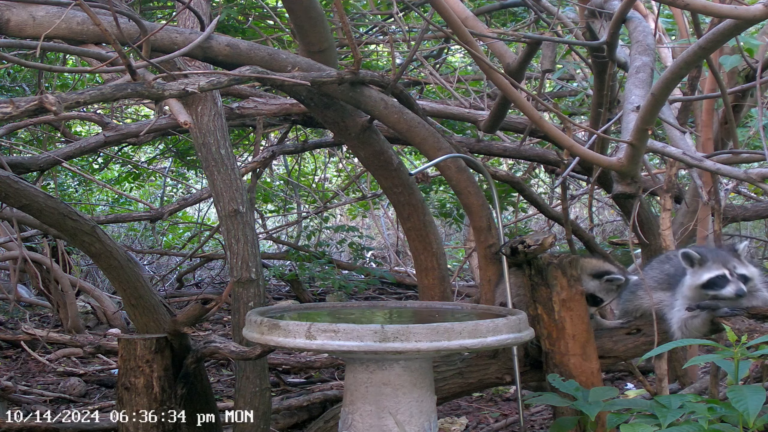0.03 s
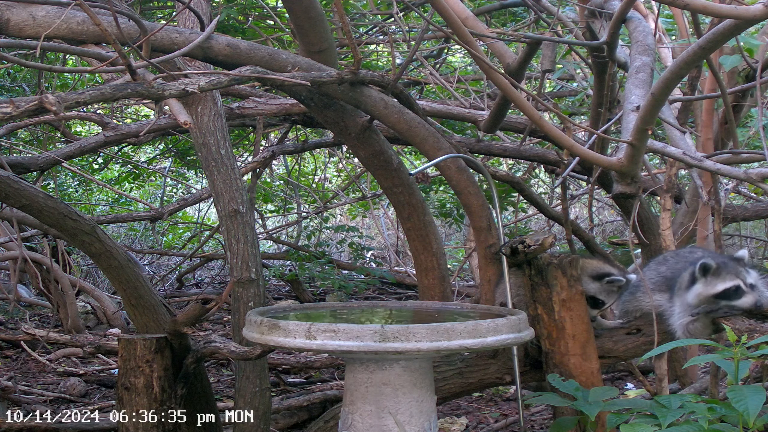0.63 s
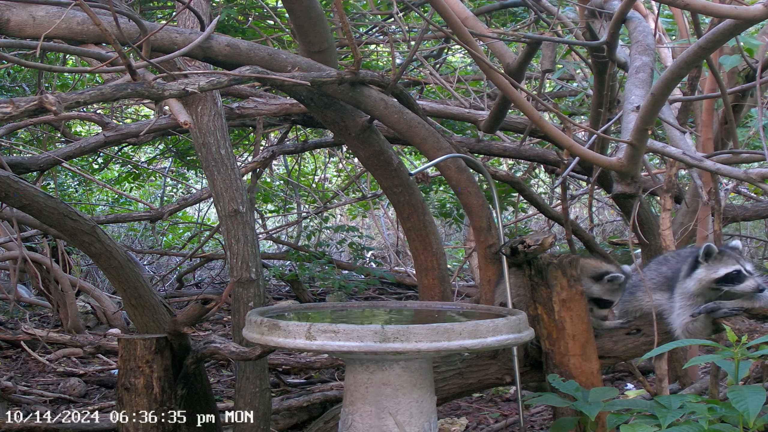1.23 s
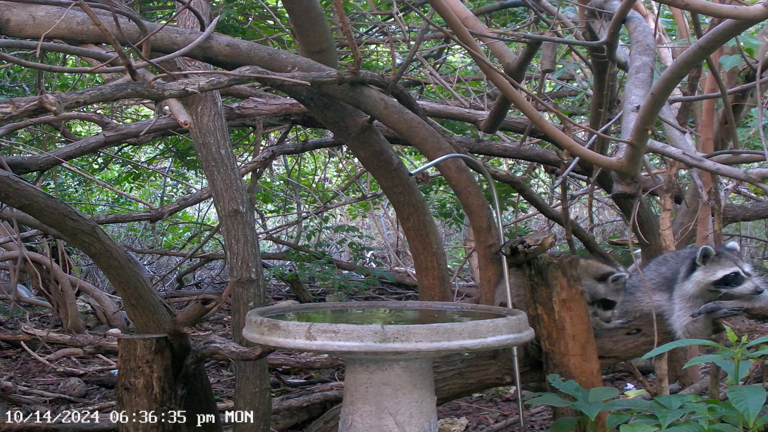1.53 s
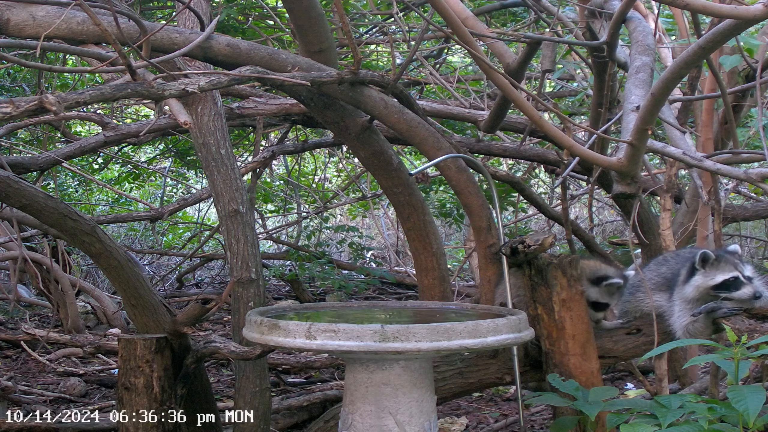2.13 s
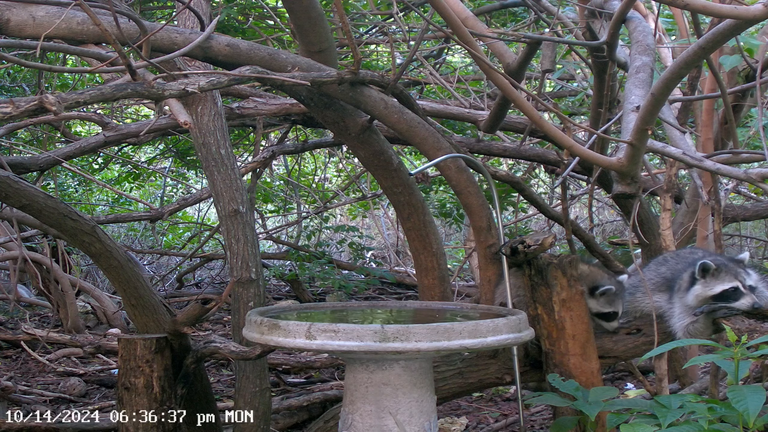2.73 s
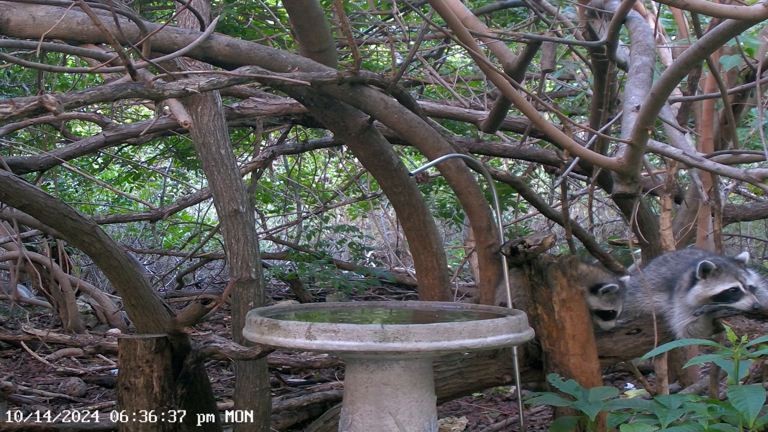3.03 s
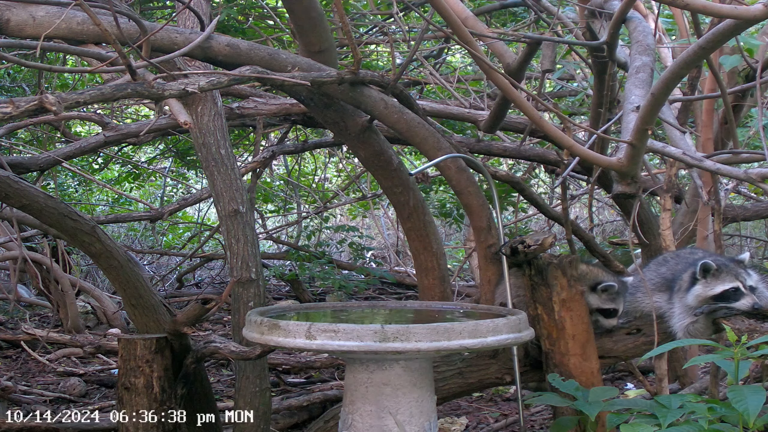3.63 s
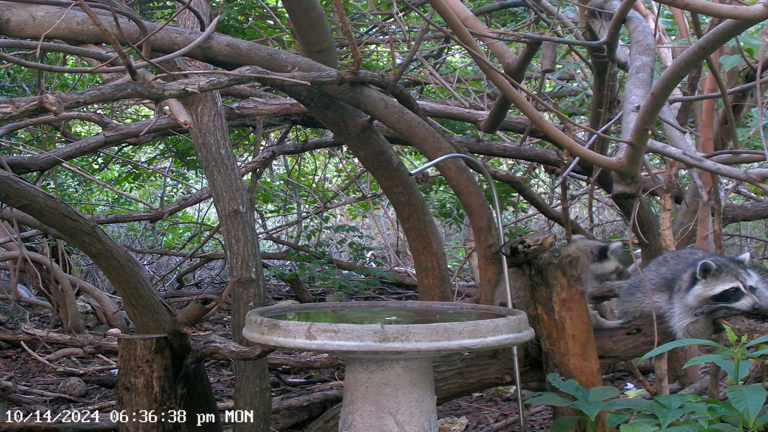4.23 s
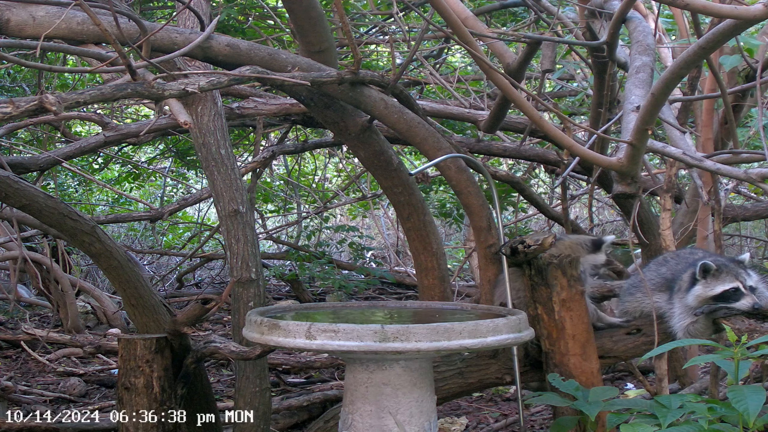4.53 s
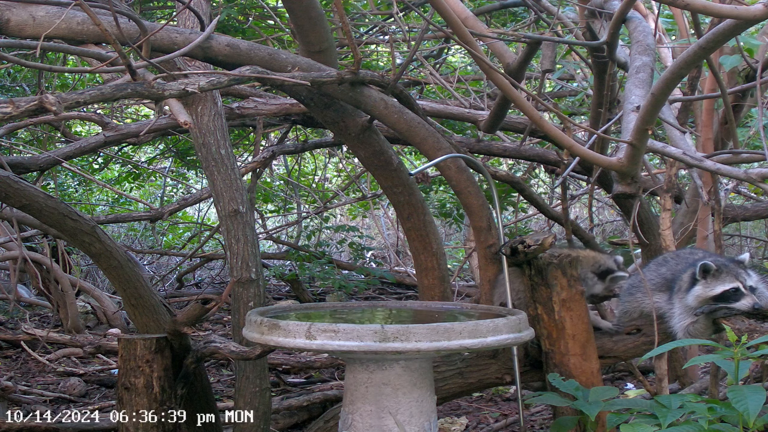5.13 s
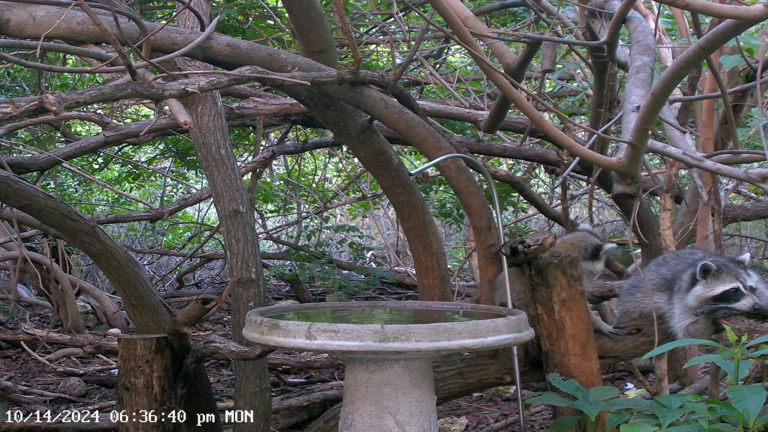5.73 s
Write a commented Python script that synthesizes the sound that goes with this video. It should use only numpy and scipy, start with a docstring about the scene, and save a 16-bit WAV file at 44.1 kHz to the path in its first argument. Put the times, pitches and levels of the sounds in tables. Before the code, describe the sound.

In a thicket, a small animal, perhaps a young raccoon, gives four short, evenly spaced squeaky chirps close to the microphone. Behind the trees a two-cylinder engine pounds, speeds up a little and fades away as the chirps end. After that, twigs tick faintly under climbing paws. Distant traffic rumbles throughout, with a faint mains hum and the hiss of a small outdoor camera.

```python
"""Chirps in a thicket

Close to the microphone a small animal, perhaps a young raccoon, gives four short squeaky chirps,
its larynx ringing through throat and mouth. Twigs tick under climbing paws; a far bird trills once.
Behind the trees a twin-cylinder engine pounds through its pipe, speeds up, then comes off the throttle.
Distant traffic rumbles on, under a faint mains hum and the hiss of a small outdoor camera."""
import sys
import numpy as np
from scipy import signal
from scipy.fft import rfft, irfft, next_fast_len
from scipy.io import wavfile
from scipy.ndimage import map_coordinates

SR = 44100
rng = np.random.default_rng(int(sys.argv[2]) if len(sys.argv) > 2 else 0)


def inscribe(sig):
    """Save sig as 16-bit PCM at rate SR to the path in sys.argv[1].

    A 1-D sig is mono; a 2-D sig holds one channel per row.
    Samples are clipped to [-1, 1] before scaling.
    """
    pcm = np.round(np.clip(np.atleast_2d(sig).T, -1, 1) * 32767)
    wavfile.write(sys.argv[1], SR, pcm.astype(np.int16))


N = 258867
TIME = np.arange(N) / SR

# Colours of the background noises. Each row: frequency in Hz, relative spectral density in dB.
HISS_COLOUR = [(500, -9.5), (1500, -4), (2000, -0.5), (2750, -3.5), (3450, 1), (3900, -0.5), (4300, -7.5),
               (4700, -6.5), (5100, -10), (7300, -10.5), (8000, -12)]
RUMBLE_COLOUR = [(20, -25), (45, -6), (65, 1), (90, -10), (160, -32.5), (400, -120)]
BUFFET_COLOUR = [(5, -8), (14, -3.5), (35, -5.5), (50, -14), (100, -40), (300, -120)]
DRONE_COLOUR = [(40, -20), (70, -4.5), (95, -0.5), (125, -1), (165, -8), (200, -15.5), (260, -18),
                (400, -49), (800, -88)]
TYRE_COLOUR = [(120, -23), (220, 1), (330, -2.5), (550, -1.5), (770, 1), (1000, -5.5), (1300, -12.5),
               (2000, -21), (3500, -34), (7000, -79)]
# The camera's hiss. Each row: time in seconds, level in dB.
HISS_LEVEL = [(0, -77.5), (1.8, -77), (2.4, -77.5), (4.3, -80.5), (5.87, -80)]
# Swells in the rumble. Each row: middle in seconds, level in dB, centre in Hz, half length in seconds.
SWELLS = [(0.736, -37, 20, 0.035), (0.982, -41.5, 65, 0.044), (1.668, -46, 62, 0.087),
          (2.765, -57, 110, 0.16), (3.798, -58.5, 45, 0.26), (4.634, -53, 59, 0.2), (5.78, -55.5, 64, 0.05)]

# Echoes off the trunks. Each row: delay in seconds, gain in dB.
TRUNK_ECHOES = [(0.0116, -17.5), (0.017, -31.5), (.057, -17.5)]
# Reverberation among the branches. Each row: frequency in Hz, seconds to fall 60 dB.
BRANCH_DECAY = [(500, 1), (3000, 0.45), (8000, 0.66)]

# Engine speed. Each row: time in seconds, four-stroke cycles per second.
ENGINE_SPEED = [(0, 30.2), (.11, 27.75), (.17, 27.4), (.65, 30.54), (.99, 32.31), (1.43, 34.54),
                (1.6, 35.86), (1.78, 36.5), (2.3, 35.82)]
# Rush of exhaust gas. Each row: frequency in Hz, relative spectral density in dB.
GAS_COLOUR = [(60, -23.5), (140, -1.5), (400, 4), (600, -6.5), (900, -6), (1300, -15), (2000, -17.5),
              (3600, -24.5), (4800, -31.5), (7500, -49)]
# The gas and the six exhaust bands, low to high, ahead of the throttle's fade.
# Each row: time in seconds, level in dB.
GAS_LEVEL = [(0, -61.5), (.7, -64.5), (1.45, -63), (1.65, -61)]
THUMP_LEVEL = [(.1, -50.5), (1.001, -51), (1.35, -51.5), (1.6, -69.5)]
BOOM_LEVEL = [(0, -54), (0.249, -49.5), (.58, -54.5), (.9, -53.5), (1, -46), (1.1, -57), (1.33, -58),
              (1.46, -50.5), (1.75, -59)]
BODY_LEVEL = [(0, -58), (.25, -65), (.45, -54), (.7, -57.5), (.95, -58), (1.251, -67.5), (1.55, -66),
              (1.75, -68)]
BARK_LEVEL = [(0, -60.5), (.11, -59), (.26, -69), (.42, -63), (.8, -63.5), (1.12, -69), (1.3, -57),
              (1.47, -64), (1.65, -58), (1.8, -65.5)]
GROWL_LEVEL = [(0, -75), (.2, -67.5), (.35, -71.5), (.8, -63), (1.05, -63.5), (1.17, -67), (1.311, -61.5),
               (1.47, -65.5), (1.65, -59), (1.78, -68.5)]
RASP_LEVEL = [(1, -86), (1.17, -70), (1.3, -57.5), (1.45, -65), (1.651, -67), (1.75, -59), (1.86, -73)]

# Twigs and bark under paws. Each row: start in seconds, level in dB before a common trim,
# resonance in Hz, its half width in Hz, seconds to fall 60 dB.
TWIG_TICKS = [(0.71, -63.5, 3300, 447, 0.037), (2.2247, -63.5, 3504, 332, 0.045),
              (2.674, -66, 2640, 550, .07), (2.704, -70, 3050, 400, .06), (3.335, -69.5, 2510, 600, 0.098),
              (3.8977, -75.5, 6600, 600, 0.17), (3.9693, -70, 2900, 650, 0.086),
              (4.385, -63.5, 3800, 700, 0.027), (4.53, -70.5, 3950, 380, 0.26),
              (4.911, -68.5, 3830, 300, 0.077), (5.0845, -71, 3450, 380, 0.082),
              (5.243, -71, 2750, 300, .06), (5.8, -67.5, 4000, 800, .025)]
# Faint ringing after the first and third chirps, and two tiny peeps before the second.
# Each row: middle in seconds, pitch in Hz, level in dB, half length in seconds.
FAINT_TONES = [(.965, 2773, -62, 0.01), (.968, 1965, -71, 0.034), (1.161, 3240, -67.5, 0.0038),
               (1.212, 3079, -71, 0.0066), (1.672, 3190, -75, 0.029)]
# The animal's throat. Each row: frequency in Hz, relative gain in dB.
THROAT_RESPONSE = [(600, -15), (1300, 7.5), (2000, 0), (2800, 10.5), (3700, -1), (4500, -7), (5200, -12),
                   (7000, -25)]
# The four chirps. Each row: peak time in seconds, attack in seconds, squeak level in dB, collapse in dB
# per second, mouth resonance in Hz, roughness in radians, opening level in dB; then, for the thin
# echoing ring that lingers after it, pitch in Hz, centre in Hz, level in dB, fade in seconds.
CHIRPS = [(0.904, 0.024, -44.5, 945.5, 2780, 0.16, -53.5, 685, 2900, -61.5, 0.052),
          (1.249, 0.026, -49.5, 1009, 2740, 0.11, -64.5, 548, 3290, -64, 0.054),
          (1.568, 0.03, -50.5, 1153, 2840, 0.27, -65.5, 526, 3110, -63, 0.034),
          (1.877, 0.028, -60, 997, 3700, 0.27, -68, 780, 3770, -79, 0.075)]
# One pitch contour per chirp. Each row of a contour: time in seconds, pitch in Hz.
CHIRP_PITCH = [
    [(.888, 720), (.899, 722), (.911, 657), (.925, 645)],
    [(1.232, 527), (1.246, 549), (1.253, 597), (1.261, 515)],
    [(1.548, 580), (1.560, 526), (1.568, 574), (1.58, 577)],
    [(1.855, 730), (1.866, 760), (1.877, 742), (1.886, 695)],
]


def amp(db):
    """Decibels to gain."""
    return 10 ** (np.asarray(db) / 20)


def unit(x):
    """x at rms 1."""
    return x / np.sqrt(np.mean(x ** 2) + 1e-20)


def bell(x, width):
    """A smooth bump of height 1 around x = 0."""
    return np.exp(-(x / width) ** 2)


def step(x, width):
    """A smooth rise from 0 to 1 around x = 0."""
    return .5 + .5 * np.tanh(x / width)


def along(points, hz):
    """(Hz, value) points read on a log frequency axis."""
    freqs, values = np.transpose(points)
    return np.interp(np.log(hz + 1), np.log(freqs + 1), values)


def curve(points):
    """(seconds, value) points joined into one value per sample."""
    return np.interp(TIME, *np.transpose(points))


def wobble(rate):
    """A smooth random curve, rate knots a second."""
    return map_coordinates(rng.standard_normal(int(N * rate / SR) + 4), [TIME * rate])


def filtered(x, response):
    """x through a response given as a function of Hz."""
    size = next_fast_len(N + SR // 2)
    return irfft(rfft(x, size) * response(np.fft.rfftfreq(size, 1 / SR)), size)[:N]


def noise(colour):
    """Noise of rms 1 with the given colour."""
    return unit(filtered(rng.standard_normal(N), lambda hz: amp(along(colour, hz))))


def hum_and_hiss():
    """The noise floor: faint mains hum and the camera's own hiss."""
    hum = amp(-65) * np.sqrt(2) * np.sin(2 * np.pi * 60 * TIME)
    return hum + amp(curve(HISS_LEVEL)) * noise(HISS_COLOUR)


def far_traffic():
    """Rumble, low buffeting, drone and tyre noise, all sinking as the distant traffic recedes."""
    def receding(near_db, far_db, midway_s):
        return amp(near_db + (far_db - near_db) * step(TIME - midway_s, 0.94))

    rumble = receding(-55.5, -62, midway_s=2) * noise(RUMBLE_COLOUR)
    buffet = receding(-51, -58, midway_s=1.5) * noise(BUFFET_COLOUR)
    drone = receding(-59, -64.5, midway_s=3) * noise(DRONE_COLOUR)
    tyres = receding(-67.5, -71, midway_s=3) * amp(0.17 * wobble(4.5)) * noise(TYRE_COLOUR)
    return rumble + buffet + drone + tyres


def swells(half_width_octaves=0.54):
    """Brief soft surges of low noise."""
    out = np.zeros(N)
    for middle_s, db, centre_hz, half_length_s in SWELLS:
        shape = bell(TIME - middle_s, half_length_s)
        band = lambda hz: bell(np.log2((hz + 1) / centre_hz), half_width_octaves)
        surge = shape * filtered(rng.standard_normal(N), band)
        out += amp(db) * surge * np.linalg.norm(shape) / np.linalg.norm(surge)
    return out


def branches(x):
    """The diffuse tail that the branches scatter back to the microphone."""
    hz, t, spectrum = signal.stft(rng.standard_normal(SR // 2), SR, nperseg=256)
    decay = amp(-60 * t / along(BRANCH_DECAY, hz)[:, None])
    tail = signal.istft(spectrum * decay, SR, nperseg=256)[1]
    return signal.fftconvolve(x, tail / np.linalg.norm(tail))[:N]


def thicket(x, wet_db):
    """The direct sound, single echoes off the trunks and a diffuse tail from the branches."""
    trunks = lambda hz: sum(amp(db) * np.exp(-2j * np.pi * hz * delay) for delay, db in TRUNK_ECHOES)
    return x + filtered(x, trunks) + amp(wet_db) * branches(x)


def through_trees(x, delays_s=(.021, .037, .062), share=.2):
    """Side paths between the trees come and go, so each harmonic of a moving source wavers on its own."""
    paths = [np.pad(x, (round(delay * SR), 0))[:N] for delay in delays_s]
    return x + share * sum(wobble(rate=7) * path for path in paths)


def firings(gap_cycles=.585, second_cylinder_db=-1, scatter_db=1.2, scatter_s=.00012):
    """Two unevenly spaced exhaust pulses per cycle, each a little different in size and timing."""
    cycles_run = np.cumsum(curve(ENGINE_SPEED)) / SR
    cycles = np.arange(int(cycles_run[-1]))
    times = np.interp(np.concatenate([cycles, cycles + gap_cycles]), cycles_run, TIME)
    size_draw, time_draw = rng.standard_normal((len(times), 2)).T
    sizes = amp(np.repeat([0, second_cylinder_db], len(cycles)) + scatter_db * size_draw)
    samples = np.clip((times + scatter_s * time_draw) * SR, 0, N - 1).astype(int)
    return np.bincount(samples, sizes, N)


def exhaust_band(pulses, band_hz, level):
    """The pulses ringing in one band of the exhaust pipe."""
    bandpass = signal.butter(5, band_hz, 'bandpass', fs=SR, output='sos')
    return amp(curve(level)) * unit(signal.sosfilt(bandpass, pulses))


def engine(puff_s=0.015, throttle_off_s=1.853, drop_db=6, fade_db_per_s=32.5, wet_db=-13):
    """Behind the trees, each firing rings the pipe and puffs out gas; both fade as the throttle closes."""
    pulses = firings()
    wavering = through_trees(pulses)
    pipe = (exhaust_band(pulses, (73, 115), THUMP_LEVEL)  # long bass waves pass the trees undisturbed
            + exhaust_band(pulses, (129, 186.7), BOOM_LEVEL)
            + exhaust_band(wavering, (206, 293.8), BODY_LEVEL)
            + exhaust_band(wavering, (338, 438.7), BARK_LEVEL)
            + exhaust_band(wavering, (457, 597.4), GROWL_LEVEL)
            + exhaust_band(wavering, (662, 785.5), RASP_LEVEL))
    puffs = signal.lfilter([1], [1, -np.exp(-1 / (puff_s * SR))], pulses)
    gas = amp(curve(GAS_LEVEL)) * unit(puffs * noise(GAS_COLOUR))
    coasting_s = TIME - throttle_off_s
    throttle = amp(-drop_db * step(coasting_s, 0.13) - fade_db_per_s * np.maximum(coasting_s, 0))
    return throttle * (pipe + gas + amp(wet_db) * branches(pipe))


def soft_notes(notes, waver_rad):
    """Faint, slightly unsteady sine notes that swell and fade."""
    drift = waver_rad * wobble(300)
    return np.sqrt(2) * sum(amp(db) * bell(TIME - middle_s, half_s) * np.sin(2 * np.pi * hz * TIME + drift)
                            for middle_s, hz, db, half_s in notes)


def bird_trill(count=10, start_s=.308, gap_s=.0171, half_note_s=0.0058, pitch_hz=1755, lift_hz=106):
    """A far bird's quick, even run of tiny notes that lifts in pitch towards its end."""
    pitches = pitch_hz + lift_hz * np.linspace(0, 1, count) ** 3
    levels_db = -74 + 1.5 * rng.standard_normal(count)
    notes = [(start_s + k * gap_s, pitches[k], levels_db[k], half_note_s) for k in range(count)]
    return soft_notes(notes, waver_rad=0.25)


def twigs(attack_s=0.002, crackle_db=3, trim_db=-7):
    """Paws climb in the thicket: each tick is a short, soft crackle in a woody resonance."""
    out = np.zeros(N)
    crackle = unit(amp(crackle_db * wobble(300)))
    for start_s, db, centre_hz, width_hz, t60 in TWIG_TICKS:
        age = np.maximum(TIME - start_s, 0)
        resonance = lambda hz: 1 / (1 + ((hz - centre_hz) / width_hz) ** 2)
        ring = unit(filtered(rng.standard_normal(N), resonance))
        out += amp(db + trim_db - 60 * age / t60) * step(TIME - start_s, attack_s) * crackle * ring
    return out


def chirp_tone(pitch, centre_hz, shake_rad, width_hz=98):
    """Nine harmonics of a tiny larynx, coloured by the throat and one resonant peak, at rms 1."""
    k = np.arange(1, 10)[:, None]
    phase = 2 * np.pi * np.cumsum(pitch) / SR + shake_rad
    gains = amp(along(THROAT_RESPONSE, k * pitch)) / np.hypot(1, (k * pitch - centre_hz) / width_hz)
    harmonics = gains * np.sin(k * phase + rng.uniform(0, 2 * np.pi, k.shape))
    return np.sum(harmonics, axis=0) * np.sqrt(2 / np.sum(gains ** 2, axis=0))


def chirps(rise_db=25, strain_s=0.067, opening_mouth_hz=3685, rasp_db=-38):
    """Close by, each chirp opens bright and raspy, peaks as a rounder squeak and leaves a thin echo."""
    out = np.zeros(N)
    jitter = wobble(400)
    flutter_db = 2 * wobble(110)
    waver_rad = .09 * wobble(110)
    breath = noise([(1200, -38), (2200, -13), (2700, 3.5), (3800, -1),
                    (4200, -16), (4700, -9), (6000, -42), (8000, -36)])
    for chirp, contour in zip(CHIRPS, CHIRP_PITCH):
        (peak_s, attack_s, db, fall_db_per_s, mouth_hz, rough_rad, opening_db,
         ring_hz, ring_centre_hz, ring_db, ring_s) = chirp
        on = (TIME > peak_s - .04) & (TIME < peak_s + .2)
        t = TIME[on] - peak_s
        age = t + attack_s
        pitch = curve(contour)[on]
        strain = np.exp(-np.abs(age) / strain_s)  # roughest at the onset, then relaxing
        shake = rough_rad * strain * jitter[on]
        opening = amp(opening_db) * bell(age - 0.012, 0.0059) * chirp_tone(pitch, opening_mouth_hz, shake)
        level = step(age, 0.002) * amp(db + np.minimum(rise_db * t / attack_s, -fall_db_per_s * t))
        squeak = level * chirp_tone(pitch, mouth_hz, shake)
        ring_age = t - 0.009  # a thin echoing ring lingers as the squeak collapses
        ring_level = amp(ring_db + flutter_db[on]) * step(ring_age, 0.004) * bell(ring_age, ring_s)
        ring = ring_level * chirp_tone(np.full(len(t), ring_hz), ring_centre_hz, shake + waver_rad[on])
        # the rasp grows more slowly than the tone, so weak chirps are the scratchiest
        rasp = amp(rasp_db) * np.sqrt(level) * strain * breath[on]
        out[on] += opening + squeak + ring + rasp
    return out


def scene():
    """One microphone in the thicket: the animal and twigs near it, bird, engine and traffic beyond."""
    calls = chirps() + soft_notes(FAINT_TONES, waver_rad=0.93) + bird_trill()
    mix = thicket(calls, wet_db=-11.5) + twigs() + engine() + swells() + far_traffic() + hum_and_hiss()
    return mix[None]


def record(dry):
    """The camera's mono channel cuts off steeply above its band limit."""
    top_hz = 7900
    return filtered(dry[0], lambda hz: 1 / np.sqrt(1 + (hz / top_hz) ** 80))[None]


dry = scene()
out = record(dry)
inscribe(out)
```